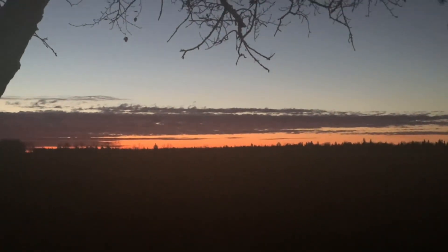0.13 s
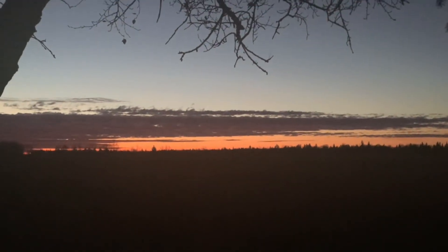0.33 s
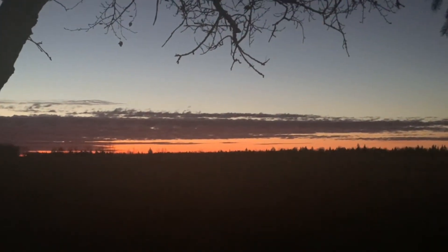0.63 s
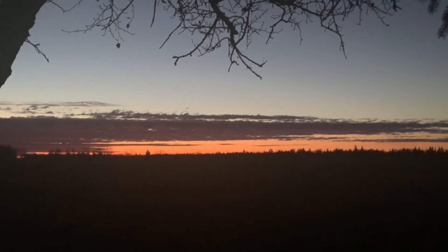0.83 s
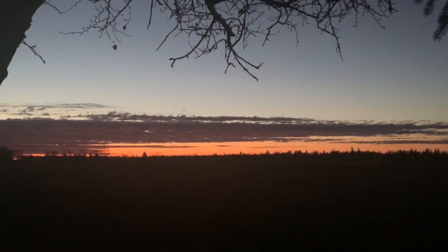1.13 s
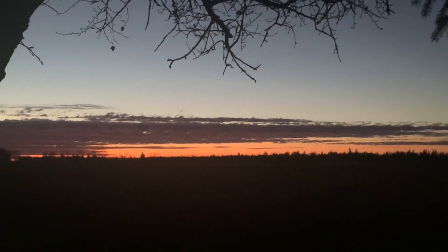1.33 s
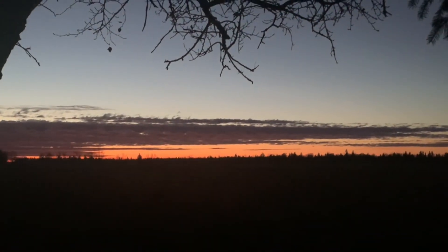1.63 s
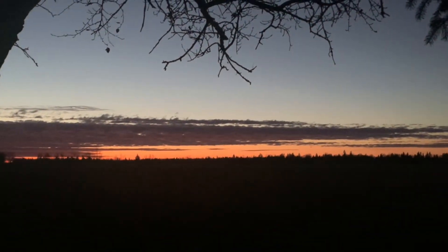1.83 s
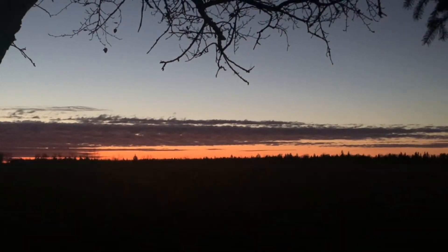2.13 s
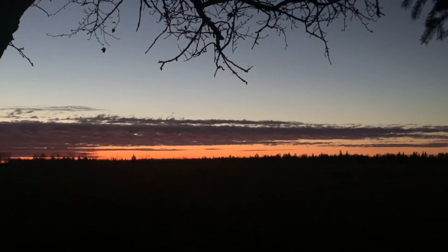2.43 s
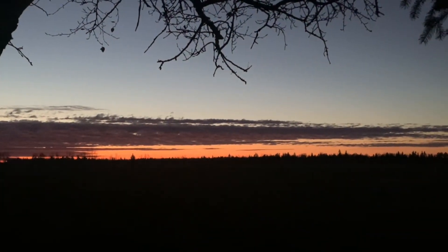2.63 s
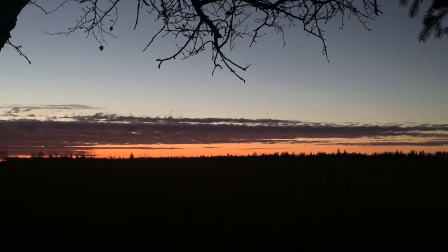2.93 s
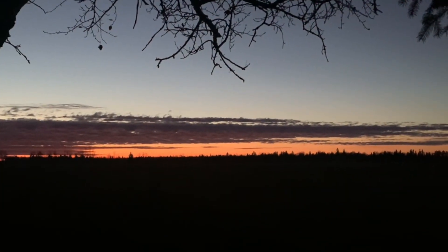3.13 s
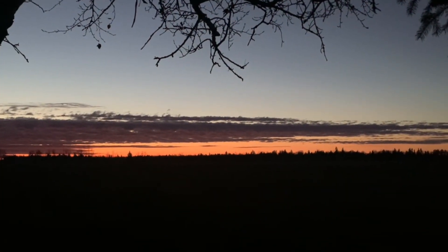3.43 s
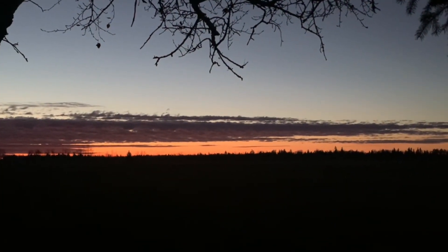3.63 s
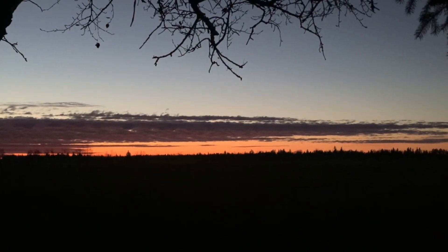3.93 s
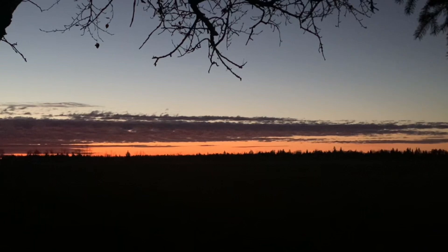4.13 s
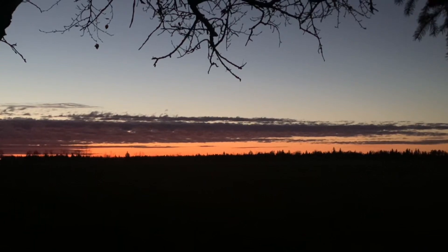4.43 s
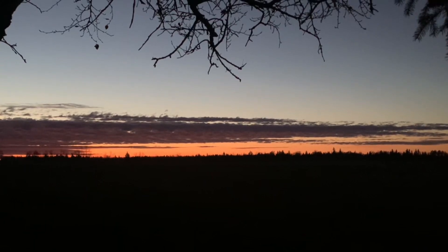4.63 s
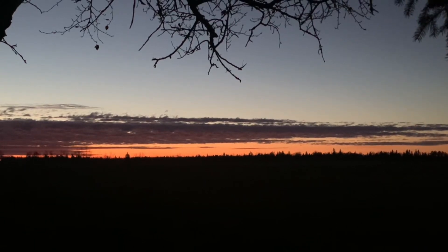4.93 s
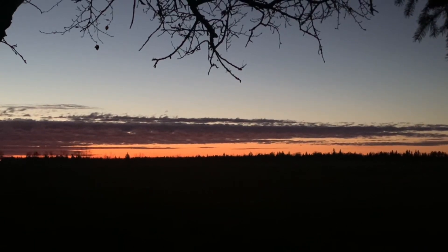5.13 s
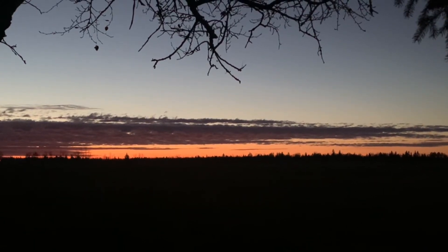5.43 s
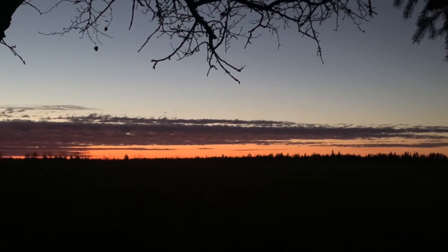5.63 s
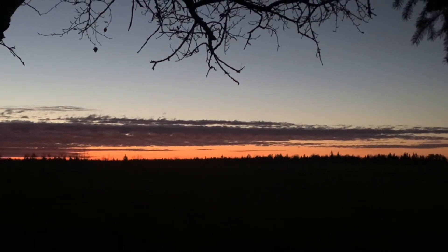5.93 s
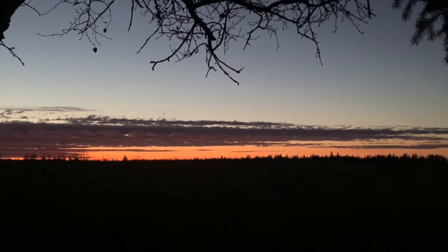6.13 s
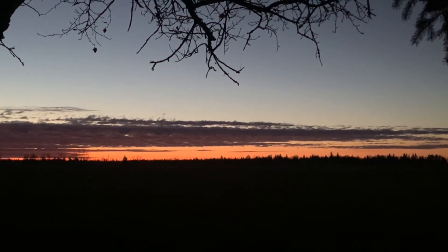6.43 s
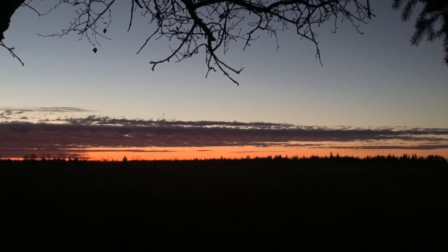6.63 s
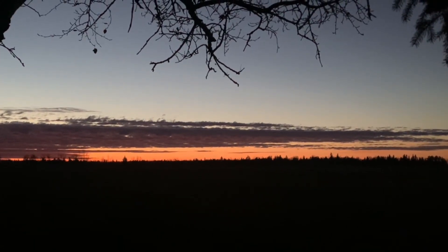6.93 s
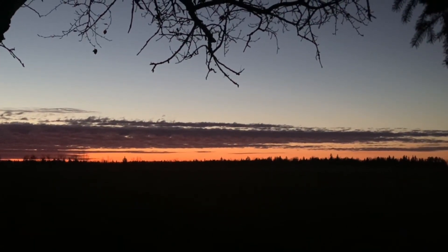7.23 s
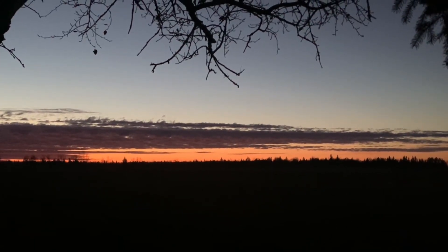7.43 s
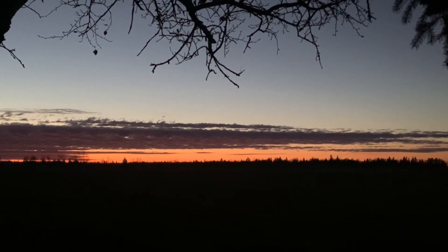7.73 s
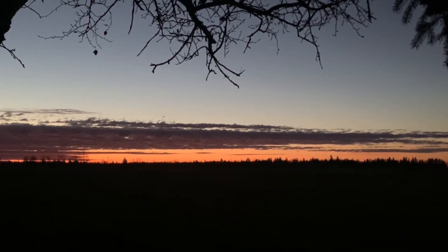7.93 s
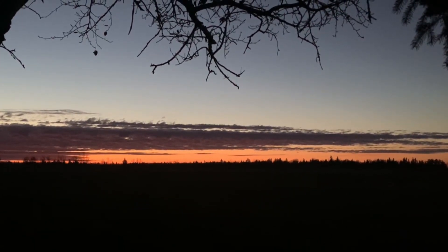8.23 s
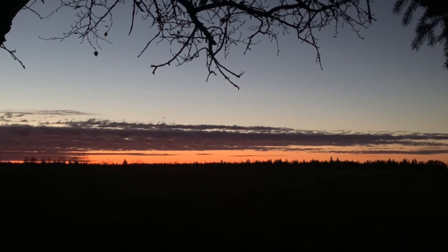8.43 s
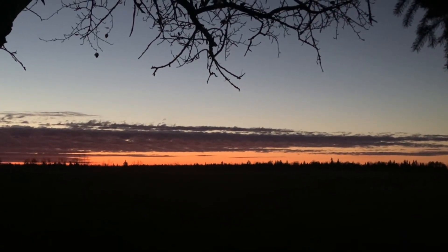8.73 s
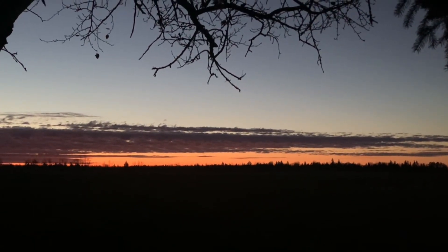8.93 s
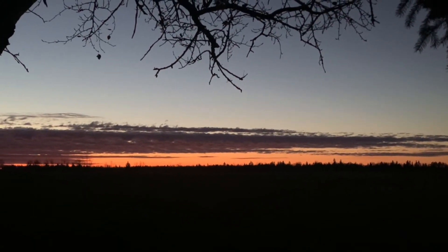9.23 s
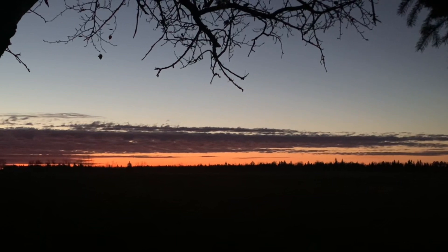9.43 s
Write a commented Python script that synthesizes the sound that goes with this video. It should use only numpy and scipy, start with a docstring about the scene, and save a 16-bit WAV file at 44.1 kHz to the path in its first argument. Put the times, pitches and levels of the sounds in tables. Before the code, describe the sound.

At a dusk field's edge, a distant coyote finishes a howl and gives spaced hoarse yips while small birds whistle and chip over faint rumble.

```python
"""A distant coyote ends a howl, then gives six hoarse yips, at dusk over an open field.
Its tones are sums of sines on a wavering pitch; its hoarseness is noise shaped by throat resonances.
Birds whistle and chip in the trees: gliding sines with echoes made of decaying random taps.
A far low rumble and faint microphone hiss are filtered noise.
A hand shifts on the camera: one thump and a few soft bumps, as ringing modes and smooth pushes."""
import sys
import numpy as np
from scipy import signal
from scipy.fft import rfft, irfft
from scipy.io import wavfile
from scipy.ndimage import uniform_filter1d

SR = 44100
rng = np.random.default_rng(int(sys.argv[2]) if len(sys.argv) > 2 else 0)


def master_out(mix):
    """Clip the mix to full scale and print it as 16-bit PCM to the path in sys.argv[1]."""
    frames = np.transpose(np.atleast_2d(mix))
    ceiling = np.clip(frames, -1, 1)
    pcm = np.round(ceiling * 32767).astype(np.int16)
    wavfile.write(sys.argv[1], SR, pcm)


N = 423360

# resonances of the coyote's throat as heard from afar: (frequency [Hz], relative level [dB])
THROAT = [(250, -51), (430, -12.5), (560, 1.5), (680, 3), (950, 0), (1190, -1.5), (1350, -15.5),
          (1580, -17), (1880, -11), (2080, -18.5), (2350, -27), (3000, -67)]
# reverberation from the tree line: (frequency [Hz], 60 dB decay time [s])
FIELD = [(300, 1.6), (680, 3.1), (1200, 0.25), (2000, 0.49), (5000, 1.4), (9000, 2)]
# scatter from branches close to the birds: (frequency [Hz], 60 dB decay time [s])
BRANCHES = [(3000, 0.22), (8000, 0.15)]


def gain_of(db):
    """Amplitude ratio: 20 dB is a factor of ten."""
    return 10 ** (np.asarray(db) / 20)


def evened(x):
    """Normalization: scales a signal to rms 1."""
    return x / np.sqrt(np.mean(x ** 2) + 1e-20)


def read(points, hz):
    """Linear interpolation of a table along a log-frequency axis."""
    f, value = np.transpose(points)
    return np.interp(np.log(hz + 1), np.log(f + 1), value)


def add(mix, s, sound):
    """Superposition: adds a stereo sound to the mix at time s."""
    part = mix[:, max(round(s * SR), 0):][:, :sound.shape[1]]
    part += sound[:, :part.shape[1]]


def coloured(x, spectrum):
    """Linear filtering: weights x by a (frequency [Hz], level [dB]) table, then scales it to rms 1."""
    weight = gain_of(read(spectrum, np.fft.rfftfreq(len(x), 1 / SR)))
    return evened(irfft(rfft(x) * weight, len(x)))


def wander(size, rate_hz):
    """Low-passed Gaussian noise: a random fluctuation of about rms 1, slower for a lower rate."""
    hz = np.fft.rfftfreq(size + SR, 1 / SR)
    noise = rng.standard_normal(size + SR)
    return evened(irfft(rfft(noise) * np.exp(-(hz / rate_hz) ** 2)))[:size]


def phase_of(hz):
    """Phase [rad] is the running integral of instantaneous frequency."""
    return 2 * np.pi * np.cumsum(hz) / SR


def bell(t, width):
    """Gaussian pulse around t = 0, down to 1/e at the width."""
    return np.exp(-(t / width) ** 2)


def gate(t, attack, release):
    """Sine-squared envelope: smooth attack, hold and release over the times t."""
    ramp = np.minimum((t - t[0]) / attack, (t[-1] - t) / release)
    return np.sin(np.pi / 2 * np.clip(ramp, 0, 1)) ** 2


def place(x, pan_db, lead=0):
    """Interaural cues: left-right level difference [dB] and the left port's phase lead [rad]."""
    left = (signal.hilbert(x) * np.exp(1j * lead)).real
    return np.array([left * gain_of(pan_db / 2), x * gain_of(-pan_db / 2)])


def echoes(x, t60s):
    """Diffuse reverberation: sparse taps from trunks and ground, each band decaying at its own rate."""
    taps = rng.standard_normal((2, SR)) * (rng.random((2, SR)) < .05)
    hz, t, z = signal.stft(taps, SR, nperseg=256)
    decay = gain_of(-60 * t / read(t60s, hz)[:, None])
    tail = signal.istft(z * decay, SR, nperseg=256)[1]
    tail = tail / np.linalg.norm(tail, axis=1)[:, None]
    return signal.fftconvolve(x, tail, axes=1)[:, :N]


def bass_cut(x, hz, order):
    """Butterworth high-pass: a higher order cuts more steeply; inaudible noise is added to its input."""
    sos = signal.butter(order, hz, "highpass", fs=SR, output="sos")
    return signal.sosfilt(sos, x + 1e-12 * rng.standard_normal(len(x)))


def howl(overtone_db=-17, overtone_swell_db=4, jitter=0.0092, breath_db=-19, swell_s=0.36,
         swell_db=2, collapse_db=30):
    """Frequency glide with a weak octave: the held note sags, brightens, then collapses hoarsely."""
    level_db, length_s, release_s = -62.5, 0.486, 0.048
    start_hz, sag_hz_per_s = 809, 100
    # the pitch drops as the breath runs out
    drop_hz, drop_at_s, drop_width_s = 193.6, .412, 0.0137
    t = np.arange(0, length_s, 1 / SR)
    drop = drop_hz / (1 + np.exp((drop_at_s - t) / drop_width_s))
    pitch = start_hz - sag_hz_per_s * t - drop
    sag = 1 - pitch / start_hz  # share of the starting pitch lost
    push = bell(t - swell_s, 0.072)
    phase = phase_of(pitch * (1 + (jitter + 0.099 * sag) * wander(len(t), 150)))
    overtone = gain_of(overtone_db + overtone_swell_db * push) * np.sin(2 * phase)
    hoarse = gain_of(breath_db + 72 * sag) * coloured(rng.standard_normal(len(t)), THROAT)
    effort = gain_of(level_db + swell_db * push - collapse_db * sag)
    effort = effort * np.sqrt(gate(t, 0.0011, release_s))
    return place(effort * (np.sqrt(2) * (np.sin(phase) + overtone) + hoarse), -2)


def coyote(echo_db=-27, far_db=-24, far_s=0.21, flicker_db=4):
    """Multipath propagation: howl and yips are scattered by the field and thrown back by the forest edge."""
    # (centre [s], length of the voiced core [s], pitch [Hz], half-line share, voice level [dB],
    #  rasp level [dB], lead-in level [dB], decay of the rasp [s])
    yip_rows = [(4.646, 0.061, 683, 0.15, -46, -46.5, -56, 0.038),
                (5.160, 0.041, 682, 0.22, -46.5, -48, -61, 0.04),
                (6.16, 0.051, 685, 0.6, -47.5, -48, -63, .039),
                (7.403, 0.0536, 648, .55, -47, -48.5, -58, 0.036),
                (8.060, 0.039, 640, .1, -47.5, -49.5, -54.5, 0.036),
                (8.592, .04, 622, .05, -48.5, -49.5, -57.5, 0.034)]
    # the coyote tires: each yip rises less than the one before
    first_rise, rise_fade_s = 0.0502, 2.27
    howl_echo_db = -12
    out, forest = np.zeros((2, 2, N))
    add(out, 0, howl())
    out = out + gain_of(howl_echo_db) * echoes(out, FIELD)
    for s, *shape in yip_rows:
        rise = first_rise * np.exp(-(s - yip_rows[0][0]) / rise_fade_s)
        add(out, s - 1 / 8, yip(*shape, rise))  # a yip is centred 1/8 s after its start
    add(forest, far_s, echoes(out, FIELD))
    late = gain_of(echo_db) * echoes(out, FIELD) + gain_of(far_db) * forest
    # moving air makes the long echoes come and go
    return out + late * gain_of(flicker_db * wander(N, 16))


def whistle(hz, db, waver=0.0042, flutter_db=1.88, flutter_hz=67):
    """Frequency and amplitude modulation: a sine with a slight quaver in pitch and level."""
    phase = phase_of(hz * (1 + waver * wander(len(hz), 78)))
    level = gain_of(db + flutter_db * wander(len(hz), flutter_hz))
    return np.sqrt(2) * np.sin(phase) * level * signal.windows.tukey(len(hz), .04)


def whistlers(scatter_db=-19, echo_db=-26, far_scatter_db=-5, far_echo_db=-16):
    """Direct-to-reverberant ratio: near whistles step and quaver, far ones flutter in more scatter."""
    # four loud whistles, one curve each: (time [s], pitch [Hz], level midway between the ports [dB])
    curves = [
        [(0.0, 2776, -40), (0.02, 2880, -58.5), (0.048, 2950, -48), (0.074, 2994, -51), (0.104, 2880, -50.5),
         (0.118, 2846, -43.5), (0.138, 2866, -49), (0.154, 2820, -43), (0.186, 2820, -48.5),
         (0.205, 2775, -44.5), (0.236, 2800, -86)],
        [(6.16, 3416, -75), (6.19, 3606, -54.5), (6.26, 3607, -46.5), (6.278, 4000, -48.5), (6.344, 4105, -43),
         (6.376, 4107, -49), (6.386, 4207, -43.5), (6.434, 4340, -45), (6.454, 4261, -45.5), (6.466, 4336, -67),
         (6.478, 4310, -57), (6.49, 4330, -70)],
        [(6.76, 2940, -72), (6.792, 2940, -55), (6.804, 2920, -51), (6.822, 3213, -47), (6.912, 3000, -45),
         (6.924, 2930, -45.5), (6.958, 2940, -46), (6.968, 3033, -44.5), (6.992, 3020, -47), (7.01, 3015, -48),
         (7.03, 3010, -50), (7.074, 2943, -48), (7.1, 2940, -54.5), (7.138, 2996, -49.5), (7.146, 2867, -53.5),
         (7.17, 2985, -49.5), (7.192, 2947, -56.5), (7.21, 3020, -82)],
        [(8.93, 4640, -72), (8.95, 4560, -66.5), (9.016, 4460, -68.5), (9.03, 4340, -56.5),
         (9.106, 4310, -53.5), (9.134, 4320, -69), (9.16, 4420, -68), (9.24, 4480, -77)],
    ]
    # where each loud whistle sits: (left-right level [dB], left port's lead [rad])
    places = [(-3, -0.99), (-1, 1.6), (-3.5, 0.79), (-4, 1.1)]
    # fainter, straight whistles: (time [s], length [s], start pitch [Hz], end pitch [Hz], level [dB],
    #  left-right level [dB], flutter [dB])
    far_notes = [(3.76, .09, 5100, 5030, -78, -6, 0), (3.85, .19, 5320, 5300, -71, -6, 4.5),
                 (4.045, 0.045, 5440, 5360, -71, -6, 2), (4.642, .04, 3260, 3250, -69, 1, 1),
                 (4.688, .145, 3320, 3290, -75, -1, 2.5), (4.88, .056, 3440, 3480, -69, 0, -2),
                 (4.926, .085, 3510, 3610, -77, -2, 1), (9.205, 0.16, 4430, 4430, -75, -2, 3),
                 (9.358, 0.13, 3570, 3510, -72, -3, -1), (9.394, 0.19, 3595, 3406, -67, -2, 1),
                 (9.572, 0.033, 3470, 3150, -70, -1, 1)]
    # one late bounce off a trunk: delay, level, left port's lead [rad]
    trunk_delay_s, trunk_db, trunk_lead = .045, -14.5, -0.97
    near, far = np.zeros((2, 2, N))
    for curve, (pan_db, lead) in zip(curves, places):
        s, hz, db = np.transpose(curve)
        t = np.arange(s[0], s[-1], 1 / SR)
        note = whistle(np.interp(t, s, hz), np.interp(t, s, db))
        # the division restores the level midway, where the ports partly cancel
        add(near, s[0], place(note, pan_db, lead) / np.cos(lead / 2))
        bounce = place(note * gate(t, .01, 0.16), pan_db, trunk_lead)
        add(near, s[0] + trunk_delay_s, bounce * gain_of(trunk_db))
    for s, length, start_hz, end_hz, db, pan_db, flutter_db in far_notes:
        pitch = np.linspace(start_hz, end_hz, round(length * SR))
        note = whistle(pitch, db, waver=.009, flutter_db=flutter_db, flutter_hz=50)
        add(far, s, place(note * signal.windows.tukey(len(pitch), .4), pan_db, 2.06))
    scatter = echoes(gain_of(scatter_db) * near + gain_of(far_scatter_db) * far, BRANCHES)
    return near + far + scatter + echoes(gain_of(echo_db) * near + gain_of(far_echo_db) * far, FIELD)


def background(swell_db=2.0):
    """Partial coherence: a lumpy rumble common to both ports; air and hiss that differ between them."""
    # spectrum of the far rumble: (frequency [Hz], relative level per hertz [dB])
    rumble_spectrum = [(12, -37), (20, -16), (42, 1.5), (59, 5.5), (72, -2), (139, -17), (350, -31),
                       (460, -59), (770, -120)]
    # slow level of the rumble: (time [s], level [dB])
    rumble_level = [(0.0, -54.5), (0.8, -52.5), (1.45, -51), (1.85, -56), (3.2, -57.5), (3.85, -53.5),
                    (4.25, -56.5), (4.8, -55.5), (5.2, -55), (5.8, -54.5), (7.2, -55), (8.75, -56.5),
                    (9.3, -53), (9.6, -55.5)]
    # spectrum of air and hiss: (frequency [Hz], relative level per hertz [dB])
    air_spectrum = [(120, -6), (250, -3.5), (500, -5), (800, -9.5), (1300, -14), (3000, -17.5),
                    (7000, -19.5), (8600, -32), (10000, -18.5), (11500, -18), (13500, -29), (15800, -22)]
    # likeness of the two ports' hiss: (frequency [Hz], left-right correlation)
    likeness = [(100, -0.089), (300, 0.75), (700, -0.0078), (1500, -0.13), (4000, 0.082), (9000, -0.34),
                (12000, 0.081)]
    air_db = -69
    s, db = np.transpose(rumble_level)
    level_db = np.interp(np.arange(N) / SR, s, db) + swell_db * wander(N, 6.8)
    rumble = gain_of(level_db) * coloured(rng.standard_normal(N), rumble_spectrum)
    same = np.clip(read(likeness, np.fft.rfftfreq(N, 1 / SR)), -.9, 1)
    mid, side = (coloured(rng.standard_normal(N), air_spectrum) for _ in range(2))
    # the ratio of difference to sum sets the correlation
    side = irfft(rfft(side) * np.sqrt((1 - same) / (1 + same)), N)
    return rumble + gain_of(air_db) * np.array([mid + side, mid - side])


def through_case(x):
    """Structure-borne transmission: case sounds reach the left port later and brighter."""
    delay_s, tilt_db_per_khz = 0.00026, 6.5  # the tilt stops growing at 1 kHz
    hz = np.fft.rfftfreq(N, 1 / SR)
    tilt = gain_of(tilt_db_per_khz * np.minimum(hz / 1000, 1) / 2)
    left = tilt * np.exp(-2j * np.pi * hz * delay_s)
    return irfft(rfft(x) * np.array([left, 1 / tilt]), N)


def handling(cut_hz=41.6, rub_db=-40.5, rub_s=1.653, rub_length=0.026):
    """Modal ringing and slow displacement: contacts ring the case, then push the microphone; skin drags."""
    # contacts of the hand on the camera: (time [s], click level [dB], push level [dB], push width [s])
    bumps = [(0.085, -68, -37, 0.004), (1.406, -55, -65, 0.00091), (1.6093, -53, -28.5, 0.0019),
             (1.6255, -44, -62, .001), (1.616, -55, -24.5, 0.0024), (1.634, -28.5, -14, 0.0022),
             (1.654, -25, -13, 0.0024), (1.6642, -32, -22, 0.0036), (1.674, -38, -40, .002),
             (2.755, -49.5, -47.5, 0.00057), (3.706, -66, -28.5, 0.0036), (7.008, -59, -27.5, 0.0033)]
    # modes of the camera body: (frequency [Hz], relative level [dB], 60 dB decay time [s])
    modes = [(327, 5, .03), (687, 9, 0.058), (820, 26.5, 0.023), (1070, 9, 0.012), (1570, -4, 0.017)]
    # skin dragging on the case: (frequency [Hz], relative level per hertz [dB])
    rub_spectrum = [(120, -26), (250, -9), (350, -0.5), (500, -16), (680, 7.5), (850, -8.5), (1000, -3),
                    (1360, -17), (1600, -6.5), (1950, -45), (2800, -51), (3450, -30.5), (4500, -63)]
    push_lag_widths = 4.37  # softer contacts take longer to press home
    touch_db, touch_s = -19.5, 0.0011  # the first touch nudges the case: level against the push, width
    # in the thump the grip shudders
    shudder_s, shudder_length_s, shudder_db, shudder_hz = 1.64, 0.036, -43.5, 326
    # the held camera sways on after each push
    sway_hz, sway_q, sway_share = 43, 1.3, 0.23
    t, ring_t = np.arange(N) / SR, np.arange(SR // 10) / SR
    ring = sum(gain_of(db - 60 * ring_t / t60) * np.sin(2 * np.pi * hz * ring_t) for hz, db, t60 in modes)
    ring = signal.sosfilt(signal.butter(8, 1750, fs=SR, output="sos"), ring)
    push, case = np.zeros(N), np.zeros((1, N))
    for s, click_db, push_db, width in bumps:
        touch = gain_of(touch_db) * bell(t - s, touch_s)
        press = bell(t - s - push_lag_widths * width, width)
        push += gain_of(push_db) * (touch + press)
        add(case, s, gain_of(click_db) * ring[None] / abs(ring).max())
    push += gain_of(shudder_db) * wander(N, shudder_hz) * bell(t - shudder_s, shudder_length_s)
    rub = gain_of(rub_db) * coloured(rng.standard_normal(N), rub_spectrum)
    rub = rub * np.exp(-((t - rub_s) / rub_length) ** 6)
    push = push + sway_share * signal.lfilter(*signal.iirpeak(sway_hz, sway_q, fs=SR), push)
    # the microphone's steep bass cut turns each push into a short falling wobble
    return through_case(case + rub) - bass_cut(push, cut_hz, order=6)


def ticks():
    """Time-bandwidth trade-off: light ticks and knocks close by, as brief pips of wavering frequency."""
    # (centre [s], frequency [Hz], width of the wavering [Hz], level [dB], length [s], left-right level [dB])
    pips = [(0.0954, 925, 100, -42, 0.0032, 5), (.093, 1350, 250, -57, 0.0026, 9),
            (1.626, 1500, 400, -49.5, 0.0014, 4.4), (2.756, 1700, 805, -54.5, 0.002, -1),
            (2.755, 3600, 1500, -67, 0.0016, 4.4), (3.7102, 572, 80, -56.5, 0.0046, 0),
            (3.711, 1005, 160, -67, 0.0053, 3), (7.011, 190.4, 60, -47, .005, 4),
            (7.013, 660, 80, -64, .008, 2)]
    t, out = np.arange(-SR // 20, SR // 20) / SR, np.zeros((2, N))
    for s, hz, width_hz, db, length, pan_db in pips:
        pitch = hz + width_hz / 2 * wander(len(t), width_hz)
        pip = np.sin(phase_of(pitch)) * bell(t, length)
        add(out, s - 1 / 20, place(gain_of(db) * pip, pan_db))
    return out


def reflected(x, shortest_s=.002, longest_s=.01, bounce_db=-9, bounce_pan_db=-6, count=4):
    """Interference: early bounces off trunks beat against a gliding call and split it into grains."""
    out = np.pad(x, ((0, 0), (0, SR // 20)))
    delays = rng.uniform(shortest_s, longest_s, count)
    leads = rng.uniform(-np.pi, np.pi, count)
    for delay, lead in zip(delays, leads):
        bounce = place(x[1], bounce_pan_db, lead) * gain_of(bounce_pan_db / 2)
        add(out, delay, gain_of(bounce_db) * bounce)
    return out / np.sqrt(1 + count * gain_of(bounce_db) ** 2)


def chippers(echo_db=-25, buzz=0.012):
    """Rapid frequency sweeps: short gliding calls, each with a brief wake from nearby branches."""
    # one row a call: (time [s], top pitch [Hz], level [dB], left-right level [dB],
    #  share of the power scattered by branches [0-1], kind)
    calls = [(1.141, 5080, -67.5, -2, 0.14, "sweep"), (2.273, 5900, -55.5, -9, 0.16, "burr"),
             (2.54, 4810, -63, -2, 0, "bow"), (2.962, 5610, -64.5, -11, 0.03, "arch"),
             (3.914, 8820, -67, 1, .5, "squeak"), (4.131, 7750, -59, 0, 0.5, "squeak"),
             (4.328, 5895, -49.5, -8.5, 0.1, "chip"), (5.253, 5530, -69, -5.5, 0, "arch"),
             (5.429, 5500, -52, -4, 0.06, "chip"), (6.004, 5580, -61.5, -5, 0.38, "chip"),
             (6.199, 5570, -57, -7, 0.37, "chip"), (6.563, 5350, -58.5, -10, 0.12, "peep"),
             (6.745, 5370, -63.5, -11, 0.2, "chip"), (7.15, 5430, -52.5, -10, 0.18, "chip"),
             (7.909, 5030, -63, -2, 0.1, "hoop"), (8.001, 5582, -50, -6.5, 0.16, "drop"),
             (8.848, 5310, -57, -5, 0.1, "slur"), (9.238, 5560, -55.5, -10, 0.07, "drop")]
    # shape of each kind of call: (time into the call [s], share of the top pitch, relative level [dB])
    kinds = {"chip": [(0, .82, -12.5), (.011, 1, -11.5), (.024, 0.96, -8.5), (.032, 1, -4.5),
             (.039, .925, -1.5), (.051, .915, -2.5), (.06, .9, -27)], "burr": [(0, .79, -11),
             (.006, .89, -11), (.011, 0.99, -3.5), (.028, 0.95, -1), (.036, .96, -7), (.043, .91, -3),
             (.049, .99, -7), (.057, .93, -9), (.062, .98, -12)], "drop": [(0, .88, -19), (.02, 0.96, -17),
             (.031, .97, -10), (.037, .92, -7), (.049, .9, -0.5), (.063, .9, -10), (.077, .9, -18)],
             "bow": [(0, 0.47, -1), (.008, .88, -2), (.022, 0.97, -1), (.04, 0.9, -6), (.062, .905, -0.5),
             (.07, .88, -6)], "arch": [(0, 0.73, -6), (.008, .92, -3), (.019, 0.99, -8), (.032, 0.94, -6),
             (.047, .93, -1), (.061, .9, -15)], "slur": [(0, .66, -8), (.008, .9, -5.5), (.022, 0.99, -14),
             (.04, 0.95, -10), (.055, .9, 2.5), (.075, 0.794, 1), (.085, 0.72, -12)],
             "hoop": [(0, .72, -14), (.007, .87, 1), (.018, .94, -1), (.028, 1, -7), (.04, .91, -3),
             (.05, .86, -4), (.067, 0.835, -5)], "peep": [(0, 0.93, -21), (.014, .98, -11),
             (.022, .935, -0.5), (.036, .93, -8)], "squeak": [(0, .86, -10), (.008, 0.93, -1), (.017, 1, 0),
             (.024, .95, -5), (.032, .83, -2)], "sweep": [(0, 0.42, 2), (.008, 0.81, 2), (.021, 1, -2)]}
    direct, scattered = np.zeros((2, 2, N))
    for s, hz, db, pan_db, blur, kind in calls:
        at, bend, swell_db = np.transpose(kinds[kind])
        t, blur = np.arange(0, at[-1], 1 / SR), np.clip(blur, 0, 1)
        pitch = hz * np.interp(t, at, bend) * (1 + buzz * wander(len(t), 410))
        note = whistle(pitch, db + np.interp(t, at, swell_db))
        call = reflected(place(note, pan_db, 1.9))
        add(direct, s, np.sqrt(1 - blur) * call)
        add(scattered, s, np.sqrt(blur) * call)
    return direct + echoes(scattered, BRANCHES) + gain_of(echo_db) * echoes(direct, FIELD)


def chaos(size, throat):
    """Irregular vibration: vocal folds beating under steady pressure, rough but even in strength."""
    beating = 1 + .9 * np.cos(phase_of(150 + 40 * wander(size, 80)))
    x = coloured(rng.standard_normal(size) * beating, throat)
    return x / np.sqrt((uniform_filter1d(x ** 2, size=800) + .3) / 1.3)


def yip(length, pitch_hz, half, voice_db, rasp_db, lead_db, end_s, rise, arch=.11, lead_s=0.039,
        onset_s=0.032, onset_width_s=.026, creak_db=-17, creak_s=0.034, shimmer_db=1.4):
    """Source and filter: a thin rasp glides into chaos, locks into an arched tone, and breaks up again."""
    # the mouth opens and closes: (time from the centre [s], scale of the throat's resonances)
    mouth = [(-.08, .82), (-.04, .92), (-.015, .99), (.02, 1.04), (.045, 1.01), (.08, 0.86)]
    # the one resonance that rings before the folds lock: (frequency [Hz], relative level [dB])
    lead_in = [(600, -40), (900, -3.5), (1070, -0.5), (1160, -2), (1400, -51)]
    # balance between the ports: (frequency [Hz], left-right level [dB])
    sides = [(650, -5), (850, -2), (1200, -0.5), (2000, -2.5)]
    t = np.arange(-SR // 8, SR // 8) / SR
    core = np.exp(-abs(2 * t / length) ** 3)
    bend = rise * np.tanh(2 * t / length) - arch * np.tanh((t / 0.03715) ** 2)
    hz = pitch_hz * (1 + bend)
    jitter = .012 + .055 * half + .04 * (1 - core)
    phase = phase_of(hz * (1 + jitter * wander(len(t), 120)))
    # strong and weak pulses alternate, which puts half lines between the harmonics;
    # the top lines need full effort: (multiple of the pitch, amplitude)
    lines = [(1, 1), (2, .55), (3, (1.05 + 1.1 * half) * core),
             (1.5, half), (2.5, .55 * half * core), (3.5, 1.1 * half * core)]
    voice = np.zeros(len(t))
    for k, size in lines:
        line_db = read(THROAT, k * hz) + (k - 1) * shimmer_db * wander(len(t), 90)
        voice += size * gain_of(line_db) * np.sin(k * phase + 2 * np.pi * rng.random())
    # the folds start weak before they lock
    voice = evened(voice) * (core + gain_of(creak_db) * bell(t + creak_s, 0.013))
    # reading the noise faster or slower scales its resonances
    mouth_t = np.cumsum(np.interp(t, *np.transpose(mouth))) / SR + t[0]
    rasp = np.interp(mouth_t, t, chaos(len(t), THROAT))
    thin = np.interp(mouth_t, t, chaos(len(t), lead_in))
    effort = np.exp(-abs(t / np.where(t < 0, lead_s, end_s)) ** 2.2)
    # a weak rasp is dull, and the steadier the tone, the more of the rasp it silences
    dull = signal.sosfiltfilt(signal.butter(6, 1500, fs=SR, output="sos"), rasp)
    rasp = (dull + (rasp - dull) * np.sqrt(effort)) * effort * (1 - (.86 - .65 * half) * core)
    noise = gain_of(rasp_db) * rasp + gain_of(lead_db) * thin * bell(t + onset_s, onset_width_s)
    ports = place(gain_of(voice_db) * voice, 0, .8) + place(noise, 0, 1.1)
    sides_db = read(sides, np.fft.rfftfreq(len(t), 1 / SR))
    return irfft(rfft(ports) * gain_of([sides_db / 2, -sides_db / 2]), len(t))


def scene():
    """Superposition of everything heard at the field's edge."""
    return coyote() + whistlers() + chippers() + handling() + ticks() + background()


def record(dry, mismatch_hz=9):
    """Band limiting: the right port loses a little more deep bass; then both lose the extreme treble."""
    edge_hz = 16000
    ports = np.array([dry[0], bass_cut(dry[1], mismatch_hz, order=1)])
    low_pass = signal.firwin(511, edge_hz, window=("kaiser", 9), fs=SR)
    return signal.oaconvolve(ports, low_pass[None], "same")


dry = scene()
out = record(dry)
master_out(out)
```